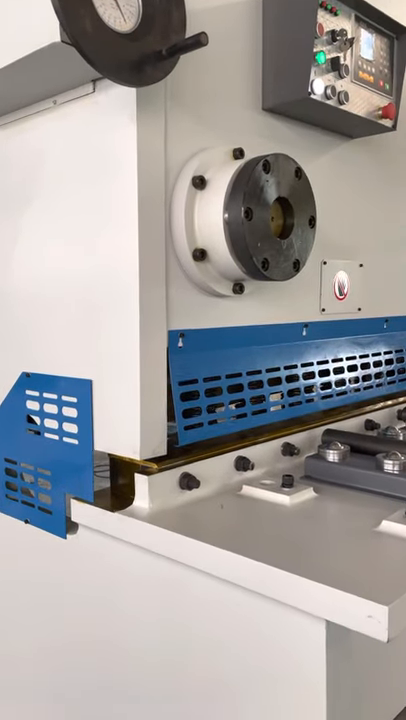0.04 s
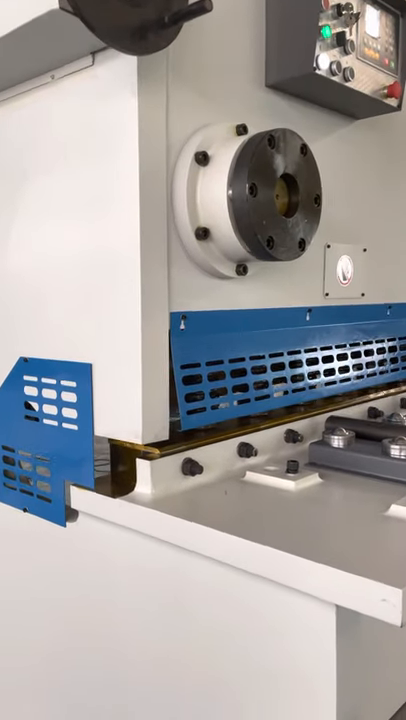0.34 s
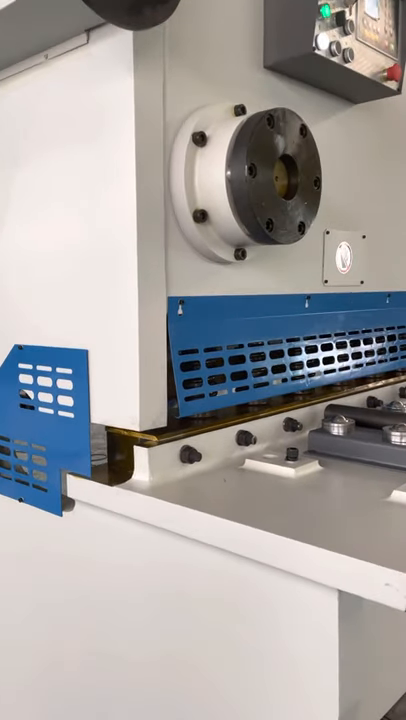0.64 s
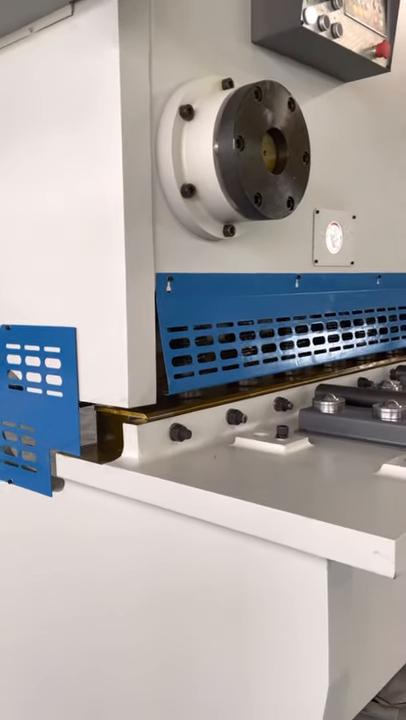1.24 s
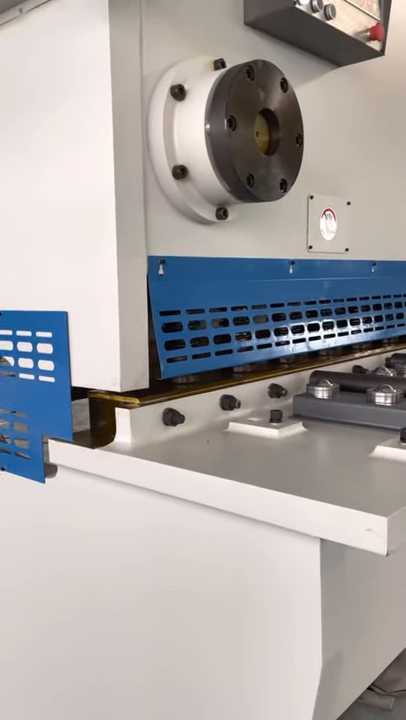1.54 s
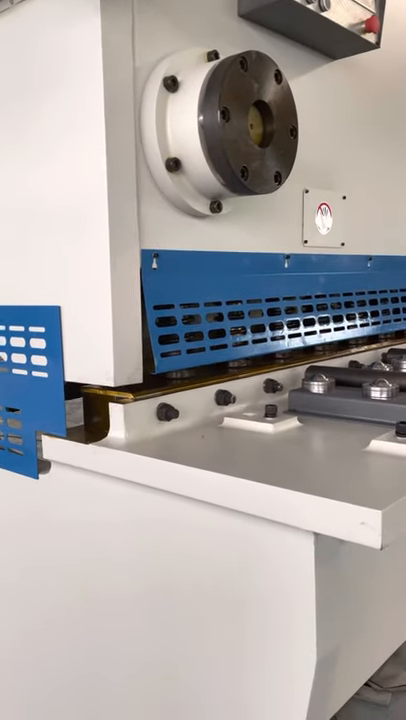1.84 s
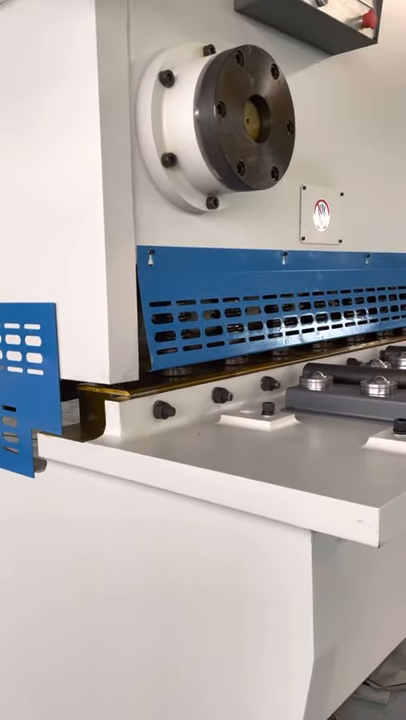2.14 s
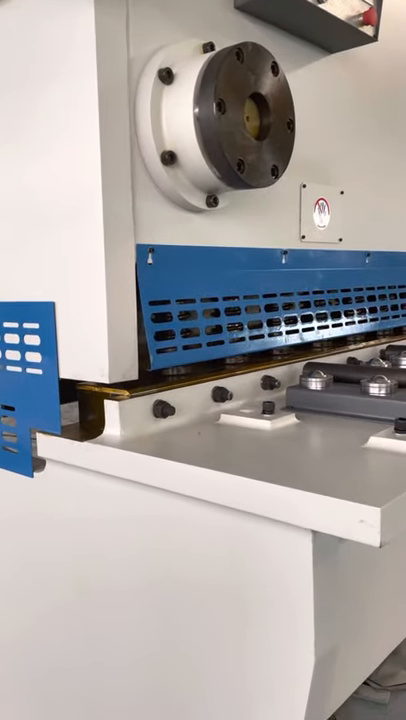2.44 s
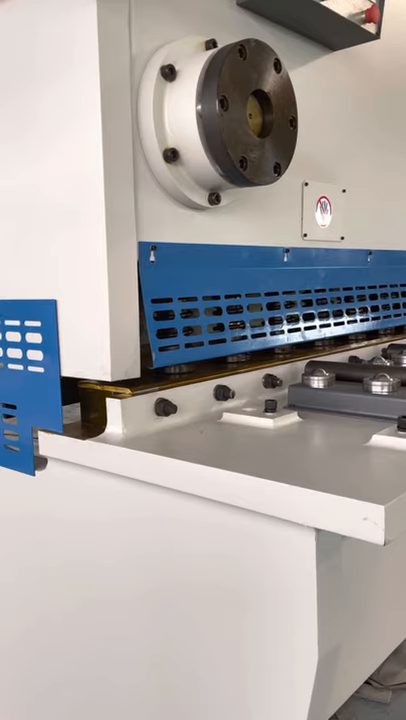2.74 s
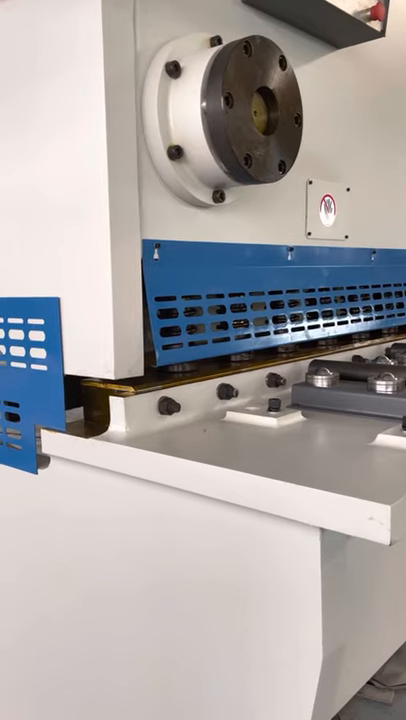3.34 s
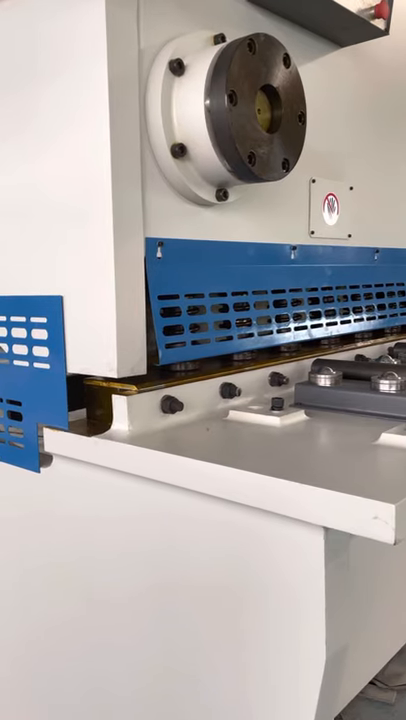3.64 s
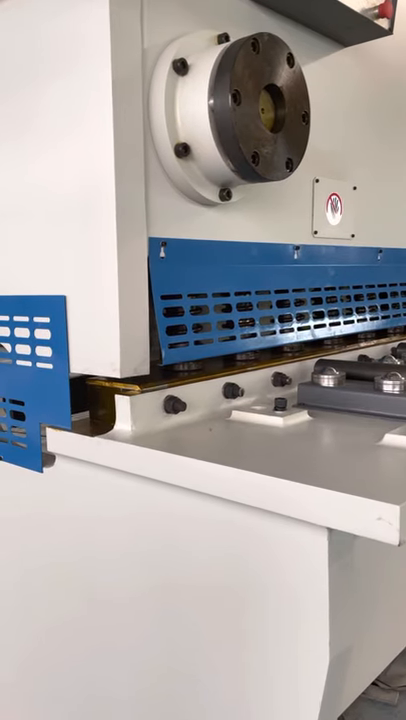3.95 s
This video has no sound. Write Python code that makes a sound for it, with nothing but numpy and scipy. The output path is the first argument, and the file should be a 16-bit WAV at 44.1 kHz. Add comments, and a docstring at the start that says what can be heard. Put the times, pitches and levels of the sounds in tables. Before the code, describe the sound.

A hydraulic plate shear idles in a workshop, its pump humming over motor rumble and oil hiss. Early on, light ticks lead into one sharp steel clank that booms briefly. A slowly moving hand-held microphone hears the hum grow louder.

```python
"""Idling hydraulic plate shear

A plate shear idles in a workshop, heard from a slowly moving hand-held microphone. Pressure
ripples in its pump hum at 299 Hz with many overtones, over motor rumble and the hiss and sizzle
of oil. Near the start, light ticks lead into one steel clank that booms in the frame and the hall."""
import sys
import numpy as np
from scipy import signal
from scipy.io import wavfile

SR = 44100
rng = np.random.default_rng(int(sys.argv[2]) if len(sys.argv) > 2 else 0)


def master_out(mix):
    """Clip the mix to full scale and print it as 16-bit PCM to the path in sys.argv[1]."""
    frames = np.transpose(np.atleast_2d(mix))
    ceiling = np.clip(frames, -1, 1)
    pcm = np.round(ceiling * 32767).astype(np.int16)
    wavfile.write(sys.argv[1], SR, pcm)


N = 176400
TIME = np.arange(N) / SR

# How fast the pump pulses. Each row: time in seconds, rate in Hz.
PUMP_RATE = [(0,299.55),(.28,299.55),(.33,298.7),(.65,298.75),(.9,299.18),(3,299.16),(4,299.1)]
# The pump's lowest note and its octave. Each row: time in seconds, level in dB.
HUM_LEVEL = [(0,-29),(.25,-30.5),(.4,-28.5),(.65,-32),(.8,-25.5),(.96,-22),(1.42,-18.5),(1.8,-19.5),(2.45,-19.5),(2.95,-20),(3.08,-21.5),(3.75,-21),(4,-20.5)]
OCTAVE_LEVEL = [(0,-33.5),(.25,-41.5),(.37,-31.5),(.68,-35),(1.2,-32.5),(1.8,-30.5),(2.9,-30),(4,-30)]
# Overtones that swell as the microphone moves, listed by multiple of the pump rate.
# Each row: time in seconds, level in dB.
SWELLING_OVERTONES = { 3: [(0,-51.5),(.8,-56),(1.35,-48),(1.85,-51.5),(2.5,-59),(4,-56)],
                      8: [(0,-56),(.6,-68),(.9,-61.5),(1.7,-54.5),(2.1,-62),(2.7,-59.5),(3.3,-61.5),(4,-62)],
                      5: [(0,-58),(.4,-57),(.7,-54),(1.25,-47),(1.7,-48),(2.65,-54),(4,-47.5)],
                      9: [(0,-63),(.55,-50),(.9,-54),(1.5,-58.5),(2.1,-64),(3,-54.5),(4,-62.5)],
                      10: [(0,-69),(.65,-52),(.88,-45.5),(1.1,-45.5),(1.5,-51.5),(1.95,-47.5),(2.65,-53),(3.3,-52),(3.5,-48),(4,-54)],
                      4: [(0,-54),(1.55,-60.5),(1.9,-51.5),(2.6,-58.5),(3.1,-52),(4,-57)],
                      17: [(0,-65),(1.55,-59),(2.2,-68.5),(2.9,-61),(4,-62)],
                      11: [(0,-78),(.55,-47),(.85,-63.5),(4,-65)],
                      13: [(0,-61.5),(.3,-54),(.53,-45),(.85,-66),(2.7,-61),(3.7,-56),(4,-52)],
                      14: [(0,-67),(.8,-58.5),(2.5,-71),(4,-59)],
                      16: [(0,-70),(1.2,-66.5),(1.65,-57.5),(2.6,-70.5),(4,-60.5)],
                      12: [(0,-66),(.7,-52.5),(2,-57),(2.8,-65),(3.3,-70),(3.8,-62)],
                      15: [(0,-58),(.5,-56),(.9,-68),(1.8,-54),(2.4,-59.5),(3.2,-66),(4,-66.5)]}
# The other overtones. Each row: multiple of the pump rate, level in dB.
QUIET_OVERTONES = [(6,-65),(7,-64),(18,-73),(19,-65),(20,-65),(21,-62),(23,-69.5)]
# How far the left ear leads in the pump's standing waves. Each row: pitch in Hz, lead in radians.
LEFT_EAR_LEAD = [(300,0.17),(600,0.3),(900,0.5),(1500,0.5),(2400,0.76),(2700,1.3),(3000,1.97),(4500,1.75),(4800,2.5),(5100,4.5),(5800,2)]

# Steel touches before the blow, bounces after it, and light ticks.
# Each row: start in seconds, relative level in dB.
CONTACTS = [(0.2883,-6),(0.2921,-1.5),(0.2955,-2.5)]
BOUNCES = [(0.3136,-10.5),(0.333,-14),(0.364,-12),(.381,-14)]
TICKS = [(0.172,-8),(.1828,-1),(0.264,-9),(0.3395,-7),(0.573,-8.5)]
# The tones of the short knock, the ringing frame and the small part that ticks.
# Each row: pitch in Hz, relative level in dB, seconds to fade by 60 dB.
KNOCK_TONES = [(157,0.5,0.061),(279.6,-1,0.11),(650,-2.5,0.039),(777,-3.5,0.033),(1110,-26,0.017)]
FRAME_TONES = [(93.1,-5,0.76),(117,-7.5,.9),(268,-10,0.25),(295.6,-2,0.45),(408.5,-3,0.2),(512,-8.5,0.3),(652,-9.5,0.27),(732,-10,0.32),(774,-9.5,0.32),(834,-14.5,0.32),(991,-11,0.26),(1116,-14.5,0.25),(1466,-8,0.11),(2250,-12.5,0.1),(2620,-10,0.13)]
TICK_TONES = [(2480,-27,.035),(4050,-30,.018),(6100,-29,.018)]
# How long panels and hall ring. Each row: frequency in Hz, seconds to fade by 60 dB.
BOOM_FADE = [(90,1),(300,1),(800,0.88),(2500,0.2),(10000,0.18)]
# Echoes from the hall. Each row: delay after the blow in seconds, level in dB.
ECHOES = [(.09,-20),(.215,-25)]

# Tones of the motor and the mains. Each row: pitch in Hz, level in dB.
MOTOR_TONES = [(49.8,-45.5),(69.5,-47.5),(149.5,-42),(172,-48.5),(448.7,-57),(648,-62),(748,-60.5),(1172,-62.5)]
# Brief low drones. Each row: middle in seconds, length in seconds, pitch in Hz, level in dB.
DRONES = [(1.712,0.14,138.1,-33.5),(1.78,0.13,229.5,-36.5),(1.976,0.2,87.6,-31),(2.012,0.21,175.8,-34.5)]
# Resonances of the oil flow. Each row: pitch in Hz, relative level in dB.
SIZZLE_TONES = [(2340,-6.5),(2445,-1),(2860,-10),(3120,-5),(3680,-8.5)]
# Faint high swishes. Each row: start in seconds, length in seconds, level in dB.
SWISHES = [(0.648,.014,-43),(3.61,.3,-56.5)]
# How the background sounds rise and fall. Each row: time in seconds, level in dB.
RUMBLE_LEVEL = [(0,-32),(.15,-33),(.21,-27),(.27,-31),(.6,-33.5),(1.1,-34),(1.6,-34),(1.95,-32.5),(2.7,-35.5),(4,-34)]
HISS_LEVEL = [(0,-41.5),(.5,-40.5),(1,-42),(1.5,-41.5),(2,-44.5),(2.6,-48),(3.3,-49),(4,-46)]
SIZZLE_LEVEL = [(0,-62),(.7,-64),(.9,-55),(1.35,-55),(2.3,-62.5),(2.7,-51),(3.15,-61.5),(4,-67)]
WHISTLE_LEVEL = [(0,-83),(1.3,-77),(1.9,-68),(2.4,-72.5),(3.7,-70.5),(4,-72.5)]

# The tone colour of each noise. Each row: frequency in Hz, relative strength in dB.
CRACK_COLOUR = [(300,-20),(700,16.5),(1500,-3.5),(2600,-1.5),(4000,0.5),(6200,-4),(9000,-6.5),(12000,-14),(16000,-19)]
BOOM_COLOUR = [(40,-22),(90,-1),(280,-1.5),(450,-6.5),(750,-6.5),(1200,-23),(2500,-8.5),(5000,-35),(12000,-46)]
ECHO_COLOUR = [(45,-24),(70,-13),(100,3),(160,-9),(290,-5),(450,-18.5),(900,-30),(3000,-63)]
TICK_COLOUR = [(700,8),(1500,2),(2600,0.5),(4200,-13),(6200,10),(9000,-16),(14000,-26)]
RUMBLE_COLOUR = [(28,-30),(36,-13),(48,-6.5),(65,4),(95,-3),(170,-1),(260,-1),(380,-3),(520,-12),(760,-12.5),(1050,-19),(1600,-25),(3000,-58)]
HISS_COLOUR = [(500,-7),(1200,4.5),(2000,0),(2700,0),(4000,-3.5),(6200,-0.5),(9000,-14),(12000,-18.5),(14000,-36),(16000,-26)]
# How alike noise is at the two ears. Each row: frequency in Hz, likeness (1 means the same).
EAR_LIKENESS = [(60,.9999),(130,1),(250,1),(500,0.83),(1000,0.59),(2000,0.83),(4000,0.01),(9000,0.86),(13000,0.48)]

BLOW_START_S, STRIKE_RISE_S = 0.296, 0.00071
LEFT_VS_RIGHT = np.array([[1], [-1]])  # plus for the left ear, minus for the right


def pump():
    """Pressure ripples make a hum; its overtones flutter and differ a little at each ear."""
    phase = pump_phase() + 0.025 * drift(40)

    def harmonic(multiple):
        """One multiple of the pump rate at both ears."""
        lead = at_hz(LEFT_EAR_LEAD, multiple * PUMP_RATE[0][1]) * LEFT_VS_RIGHT / 2
        shift = rng.uniform(0, 2 * np.pi) + 0.28 * drift(0.99)
        return np.sqrt(2) * np.cos(multiple * phase + lead + (multiple > 2) * shift)

    hum = from_db(in_time(HUM_LEVEL)) * harmonic(1)
    hum += from_db(in_time(OCTAVE_LEVEL) + 0.6 * LEFT_VS_RIGHT) * harmonic(1.9993)
    levels = [(multiple, in_time(rows)) for multiple, rows in SWELLING_OVERTONES.items()]
    levels += [(multiple, db + 0.13 * hiss_swing()) for multiple, db in QUIET_OVERTONES]
    for multiple, db in levels:
        flutter_db = 1.5 * drift(25) + 0.7 * np.array([drift(2.6), drift(2)])
        hum += from_db(db + flutter_db) * harmonic(multiple)
    return hum


def clank():
    """Steel touches with a bright crack, then a blow bounces, rings the frame and booms in the hall."""
    touches = 0
    for start, db in CONTACTS:
        snap = decay(start, fade_s=0.022, rise_s=0.00036)
        tail = from_db(-17) * decay(start, fade_s=0.19, rise_s=0.005)
        touches += from_db(db - 15) * (snap + tail)
    knocks = struck(KNOCK_TONES, BLOW_START_S)
    knocks += sum(from_db(db) * struck(KNOCK_TONES, start) for start, db in BOUNCES)
    frame = struck(FRAME_TONES, BLOW_START_S)
    boom = noise(BOOM_COLOUR, lambda hz: decay(BLOW_START_S, at_hz(BOOM_FADE, hz), rise_s=0.0042))
    crack = noise(CRACK_COLOUR, lambda hz: touches)
    return crack + from_db(-9.5) * knocks + from_db(-17.5) * frame + from_db(-23) * boom


def hall_echo():
    """The hall sends the boom back in two low swells."""
    swells = sum(from_db(db) * decay(BLOW_START_S + delay, fade_s=0.38, rise_s=0.011)
                 for delay, db in ECHOES)
    return noise(ECHO_COLOUR, lambda hz: swells)


def ticks():
    """A small steel part ticks and rings briefly."""
    bursts = ringing = 0
    for start, db in TICKS:
        snap = decay(start, fade_s=0.017, rise_s=0.00025)
        tail = from_db(-17) * decay(start, fade_s=0.14, rise_s=0.003)
        bursts += from_db(db - 20) * (snap + tail)
        ringing += from_db(db) * struck(TICK_TONES, start)
    return noise(TICK_COLOUR, lambda hz: bursts) + ringing


def motor():
    """The motor and mains make wavering tones over a lumpy rumble."""
    tones = 0
    for hz, db in MOTOR_TONES:
        gain = from_db(db + 0.5 * drift(2.7))
        shift = 0.22 * drift(0.61) + rng.uniform(0, 2 * np.pi)
        tones += gain * np.cos(2 * np.pi * hz * TIME + shift)
    rumble = noise(RUMBLE_COLOUR, lambda hz: from_db(in_time(RUMBLE_LEVEL) + 1.6 * drift(1.6)))
    return np.sqrt(2) * tones + rumble


def drones():
    """Low tones swell and fade under the hum."""
    tones = 0
    for middle, length, hz, db in DRONES:
        swell = in_time([(middle - length / 2, 0), (middle, 1), (middle + length / 2, 0)])
        tones += from_db(db) * swell * np.sin(2 * np.pi * hz * TIME)
    return np.sqrt(2) * tones


def oil_hiss():
    """The oil's hiss pulses with the pump and gets duller as it fades."""
    level_db = in_time(HISS_LEVEL)
    tilt_db = 0.51 * hiss_swing()  # per octave, pivoting at 3000 Hz
    hiss = noise(HISS_COLOUR,
                 lambda hz: from_db(level_db + tilt_db * np.log2(hz / 3000) + 0.91 * drift(6)))
    return hiss * (1 + 0.19 * np.cos(pump_phase()))


def oil_sizzle(width_hz=28):
    """Flowing oil shakes narrow resonances at random, differently at each ear."""
    sizzle = 0
    for hz, db in SIZZLE_TONES:
        gain = from_db(db + 3.5 * drift(10))
        phase = 2 * np.pi * hz * TIME
        ears = [drift(width_hz) * np.cos(phase) + drift(width_hz) * np.sin(phase) for ear in (0, 1)]
        sizzle += gain * np.array(ears)
    return from_db(in_time(SIZZLE_LEVEL)) * sizzle


def swishes():
    """Faint puffs of high noise rise quickly and fade."""
    air = rms_one(band_pass(rng.standard_normal((2, N)), 8000, 11500))
    return air * sum(from_db(db) * in_time([(start, 0), (start + length / 10, 1), (start + length, 0)])
                     for start, length, db in SWISHES)


def whistle(pitch_hz=12016):
    """A thin high whistle wavers separately at each ear."""
    level_db = in_time(WHISTLE_LEVEL)
    phase = 2 * np.pi * pitch_hz * TIME
    ears = [from_db(level_db + drift(8)) * np.cos(phase + 2 * drift(8)) for ear in (0, 1)]
    return np.sqrt(2) * np.array(ears)


def pump_phase():
    """How far the pressure ripple has cycled, in radians."""
    return 2 * np.pi * np.cumsum(in_time(PUMP_RATE)) / SR


def hiss_swing():
    """How far the hiss is above its average level, in dB."""
    level_db = in_time(HISS_LEVEL)
    return level_db - level_db.mean()


def struck(tones, start):
    """One hit sets off fading tones; every second one starts in the opposite direction."""
    ringing = 0
    for k, (hz, db, fade_s) in enumerate(tones):
        gain = from_db(db) * decay(start, fade_s, STRIKE_RISE_S)
        ringing += (-1) ** k * gain * np.sin(2 * np.pi * hz * (TIME - start))
    return ringing


def decay(start, fade_s, rise_s):
    """The loudness of a hit: a quick rise, and a fall of 60 dB in fade_s."""
    age = np.maximum(TIME - start, 0)
    fall = np.minimum(np.log(1000) * age / fade_s, 10 * np.pi)
    return (1 - np.exp(-age / rise_s)) * np.exp(-fall)


def noise(colour, envelope):
    """Stereo noise of strength 1, with each narrow band then multiplied by envelope(hz)."""
    edges = np.geomspace(28, 16500, 25)
    white = rng.standard_normal((2, 2, N))
    bands = power = 0
    for k, (low, high) in enumerate(zip(edges, edges[1:])):
        hz = np.sqrt(low * high)
        shared, opposed = from_db(at_hz(colour, hz)) * band_pass(white[k % 2], low, high)
        alike = at_hz(EAR_LIKENESS, hz)
        stereo = np.sqrt(1 + alike) * shared + np.sqrt(1 - alike) * opposed * LEFT_VS_RIGHT
        bands += envelope(hz) * stereo
        power += np.mean(shared ** 2)
    return bands / np.sqrt(2 * power)


def band_pass(x, low_hz, high_hz):
    """Keep the sound between two frequencies."""
    return signal.sosfilt(signal.butter(2, [low_hz, high_hz], "band", fs=SR, output="sos"), x)


def drift(rate_hz):
    """Smooth random wandering with a spread of 1."""
    step = 100  # samples between random points
    memory = np.exp(-2 * np.pi * rate_hz * step / SR)
    kicks = rng.standard_normal(N // step + 1002)
    slow = signal.lfilter([1], [1, -2 * memory, memory ** 2], kicks)[1000:]  # skip the settling
    return np.interp(np.arange(N) / step, np.arange(len(slow)), rms_one(slow - slow.mean()))


def from_db(db):
    """Turn decibels into a multiplier."""
    return 10 ** (np.asarray(db) / 20)


def rms_one(x):
    """Scale to an average strength (rms) of 1."""
    return x / np.sqrt(np.mean(x ** 2) + 1e-20)


def in_time(rows):
    """Join (seconds, value) points by straight lines."""
    return np.interp(TIME, *np.transpose(rows))


def at_hz(rows, hz):
    """Read between (Hz, value) points, with octaves evenly spaced."""
    frequencies, values = np.transpose(rows)
    return np.interp(np.log(hz), np.log(frequencies), values)


def from_left(x, lag_s=8e-5):
    """A sound on the left reaches the right ear slightly later."""
    return np.array([x[0], np.interp(TIME - lag_s, TIME, x[1])])


def scene():
    """The running machine with its ticks and one clank."""
    machine = pump() + motor() + drones()
    left_side = from_left(oil_hiss() + swishes() + ticks())
    return machine + left_side + oil_sizzle() + whistle() + clank() + hall_echo()


def record(dry, dip_hz=7575, cutoff_hz=15800):
    """The microphone has a dip in the treble; peaks are clipped and the highest sounds are cut."""
    dipped = signal.lfilter(*signal.iirnotch(dip_hz, Q=2, fs=SR), dry)
    clipped = np.clip(dipped, -0.9, 0.9)
    return signal.sosfilt(signal.cheby2(12, 70, cutoff_hz, fs=SR, output="sos"), clipped)


dry = scene()
out = record(dry)
master_out(out)
```